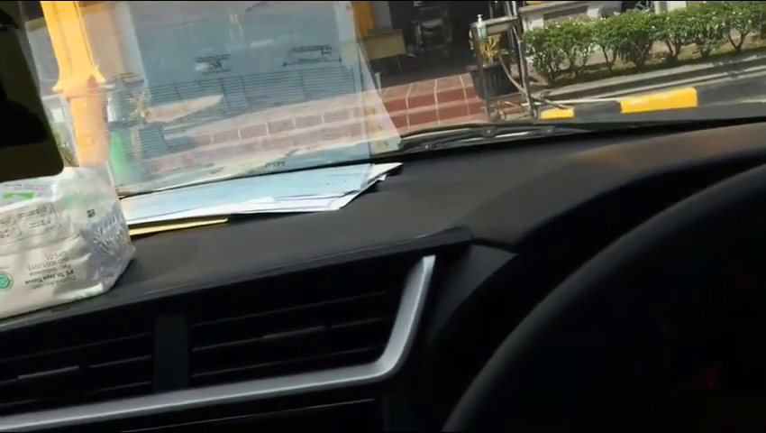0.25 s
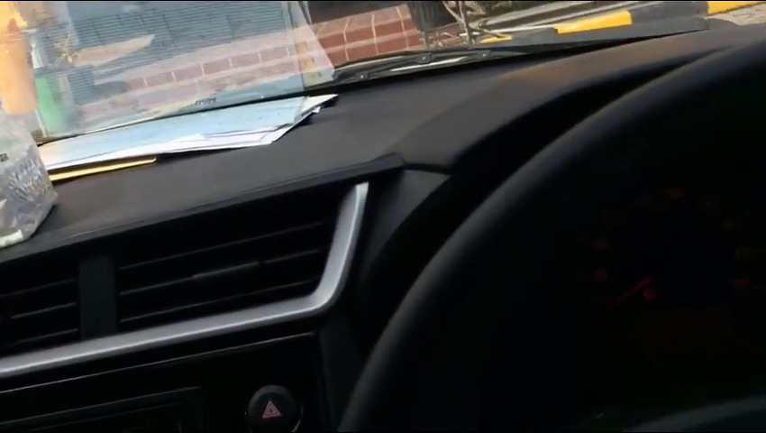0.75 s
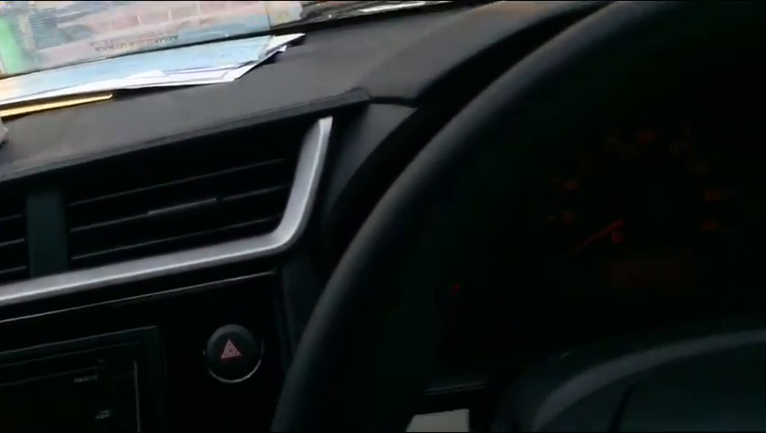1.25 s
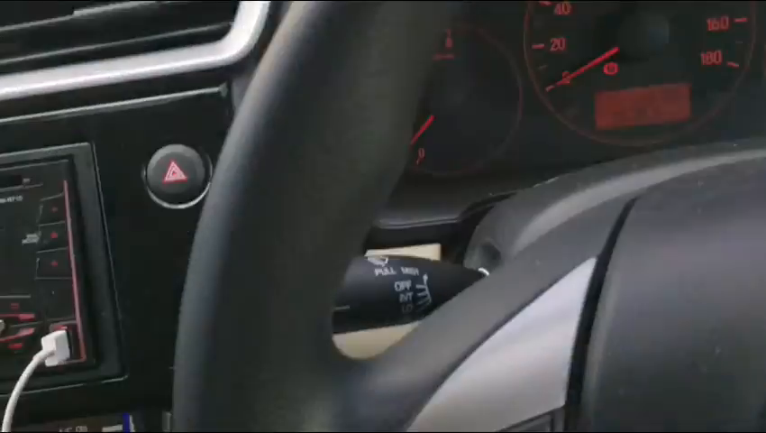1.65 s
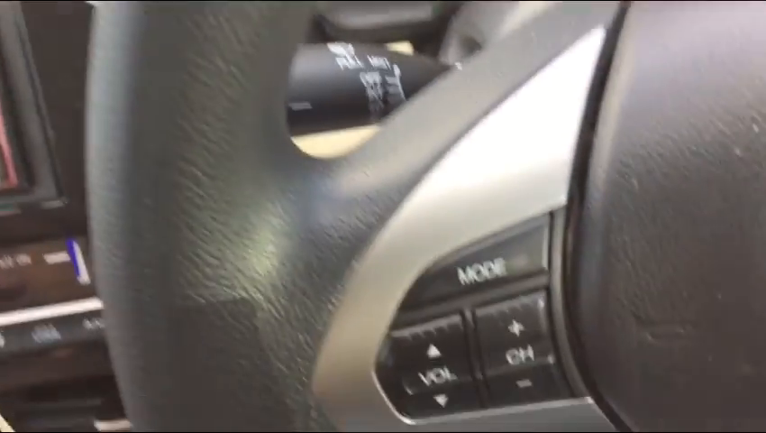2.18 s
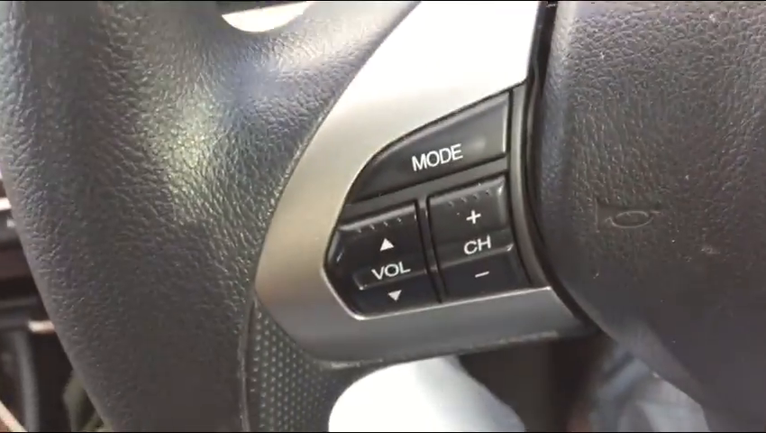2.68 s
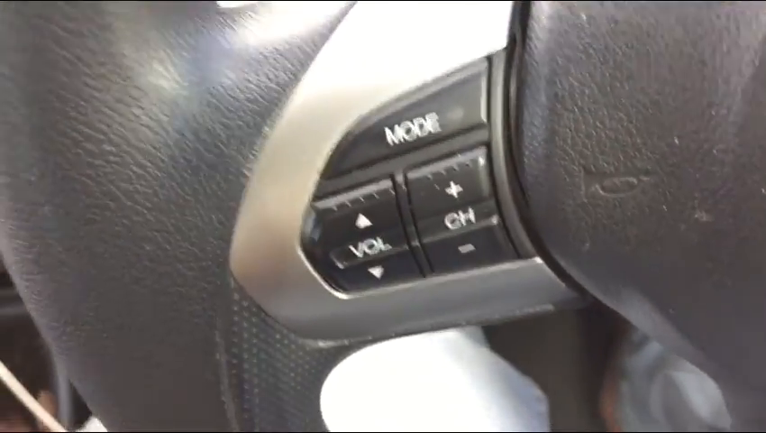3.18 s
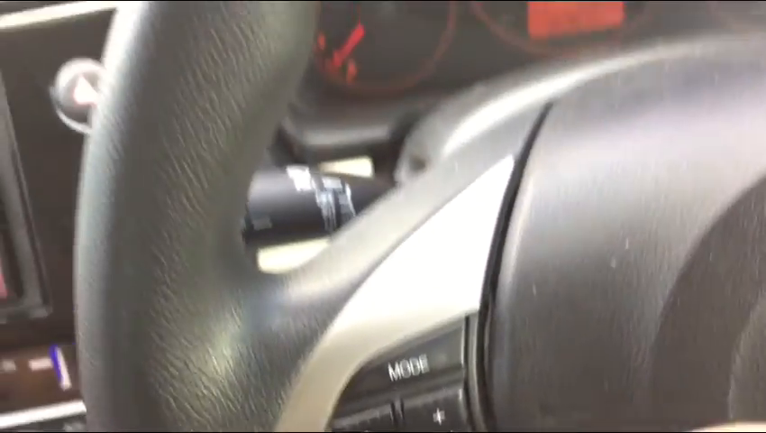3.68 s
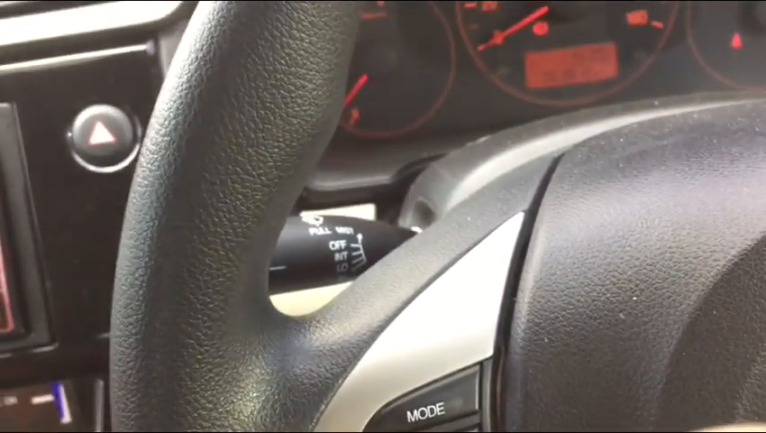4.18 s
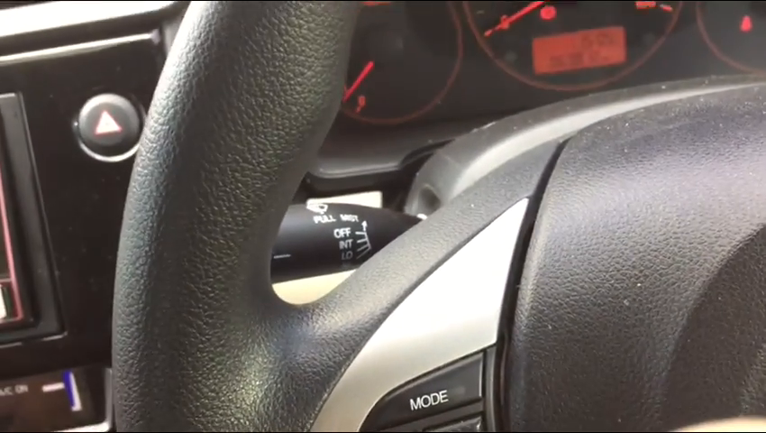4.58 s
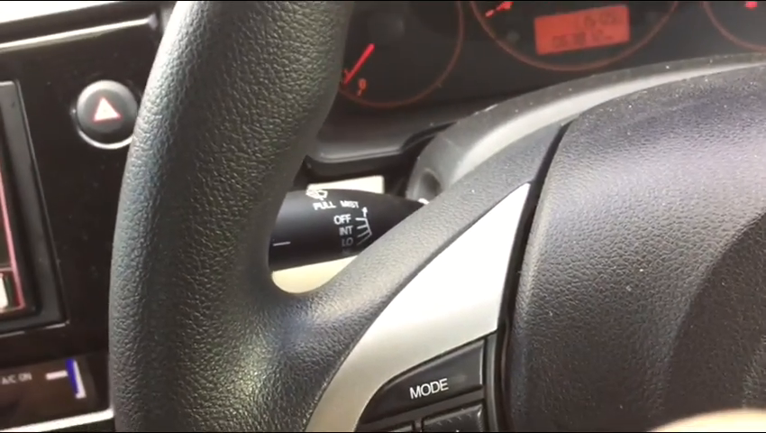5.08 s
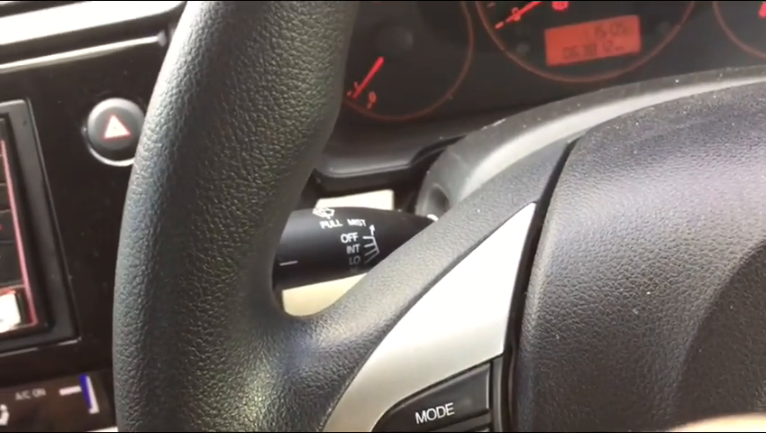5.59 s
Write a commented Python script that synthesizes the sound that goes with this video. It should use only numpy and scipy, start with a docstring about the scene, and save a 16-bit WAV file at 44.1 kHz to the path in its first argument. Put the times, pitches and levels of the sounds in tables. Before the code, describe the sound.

Inside a parked car, a handheld phone microphone picks up steady, low-heavy air from the dashboard vents. After half a second, uneven soft thumps of air begin to hit the microphone, growing dense in the middle. A very faint, thin finger scrape comes early, between one and two seconds; later a few dry handling ticks, one around three and a half seconds and the sharpest near five. The fan never stops.

```python
"""Inside a parked car with the air-conditioning fan on, a phone's microphone starts at the dashboard.
Noise coloured by duct resonances makes the steady air; a draught of small whirls rumbles, faint at first.
From half a second on, gusts thump the microphone unevenly, each a decaying, slowing pressure swing.
Between one and two seconds a fingertip scrapes the shell in grainy hiss as the phone nears the wheel.
It then moves on to the seat, and the grip lets out a few sharp ticks, each a short filtered pulse."""
import sys
import numpy as np
from scipy import signal
from scipy.fft import rfft, irfft
from scipy.io import wavfile
from scipy.ndimage import map_coordinates

SR = 44100
rng = np.random.default_rng(int(sys.argv[2]) if len(sys.argv) > 2 else 0)


def put_to_file(sound):
    """Save the sound as 16-bit audio at rate SR, in the file named by the first command-line argument."""
    columns = np.atleast_2d(sound).T  # one column per channel
    safe = np.clip(columns, -1, 1)
    whole_steps = np.round(safe * 32767)
    wavfile.write(sys.argv[1], SR, whole_steps.astype(np.int16))


N = 257984

# air rushing from the vents: (frequency [Hz], density relative to AIR_DB [dB])
AIR_SPECTRUM = [(25, -4), (55, 17), (90, 9.5), (130, 6.5), (190, 8), (260, 1), (310, -5.5), (400, -7),
                (780, -11), (1100, -5.5), (2000, -12), (2600, -16.5), (3200, -23.5), (4200, -25)]
AIR_DB = -63.5  # dB per Hz
# hiss of the vent slats: (frequency [Hz], density relative to HISS_DB [dB])
HISS_SPECTRUM = [(3800, 0.5), (4300, -8.5), (5000, -1), (7600, -9), (10400, -15.5), (12000, -11),
                 (15500, -19.5)]
HISS_DB = -96  # dB per Hz
# duct and grille resonances: (frequency [Hz], width [Hz], lift [dB])
DUCT_RESONANCES = [(396.5, 22.6, 9), (566, 64, 5.5), (989.6, 51, 8.5), (1477, 24, 5.5), (1692, 24, 4),
                   (2364, 71, 5.5), (6640, 640, 2.5), (8600, 220, 5.5), (9520, 370, 4)]
# cabin reflections at the dashboard: (frequency [Hz], width [Hz], lift or dip [dB])
DASHBOARD_REFLECTIONS = [(55, 12, -10), (190, 11, 3), (870, 110, -3.5), (1745, 170, 4), (2340, 57, -8),
                         (2840, 180, 3.5), (3540, 120, -5.5), (4100, 120, 4)]
# cabin reflections at the wheel: (frequency [Hz], width [Hz], lift or dip [dB])
WHEEL_REFLECTIONS = [(500, 840, 2), (1593, 85, -6), (2640, 26, -11), (5000, 83, -10.5), (7881, 710, -2.5),
                     (12000, 2000, -1.5)]
# cabin reflections at the seat: (frequency [Hz], width [Hz], lift or dip [dB])
SEAT_REFLECTIONS = [(1650, 54, -2), (2584, 77, 3), (3100, 270, -3), (3940, 200, 0.5), (4950, 99, -6.5),
                    (5950, 800, 1), (7800, 400, -3.5), (8300, 150, 3.5), (11500, 1300, -1)]
# the phone's path: (time [s], place [0 dashboard, 1 wheel, 2 and above seat], fan level before its swell [dB])
PHONE_PATH = [(0, 0.041, 0.5), (.8, 0.038, 0.4), (1.4, 0.15, 0), (1.9, 0.88, -0.24), (2.6, 0.73, -2),
              (3.4, 0.91, -2), (3.85, 1.76, -0.2), (4.6, 3, 0), (5.85, 3.6, 0)]
# strength of the draught before its flutter: (time [s], level [dB])
DRAUGHT_STRENGTH = [(0, -53), (0.9, -41), (1.1, -31.5), (1.6, -22), (2.3, -35), (2.7, -25), (3.2, -23.5),
                    (3.55, -20), (3.7, -35), (4.3, -24), (4.6, -32), (5.45, -22), (5.85, -51)]
# gusts that strike the microphone, before the common gust level in scene():
# (time [s], level [dB], pitch [Hz], decay [s], steep front relative to the level [dB])
GUST_HITS = [(0.507, -15.5, 121, 0.0061, -27), (0.543, -18, 167, 0.0088, -18),
             (0.801, -8, 99.7, 0.0039, -26), (1.047, -17.5, 190, 0.0062, -10),
             (1.078, -13, 80.5, 0.0077, -29), (1.113, -13.5, 183, 0.0036, -34),
             (1.174, -12.5, 139.5, 0.004, -16), (1.209, -14, 82.6, 0.01, -12),
             (1.233, -17, 119.3, 0.0055, -15), (1.363, -14.5, 82.4, 0.012, -14),
             (1.378, -14, 78, 0.0057, -13), (1.553, -14, 119, 0.01, -18), (1.641, -15, 109, 0.0056, -8),
             (1.721, -14.5, 182.3, 0.0089, -6), (1.774, -18, 576, 0.0025, -10),
             (1.779, -7.5, 120, 0.0054, -18), (1.803, -4, 216, 0.0022, -16), (1.826, -12, 204, 0.0081, -23),
             (1.926, -13.5, 338, 0.0029, -3), (1.931, -14, 85, 0.0067, -20),
             (2.011, -5, 200, 0.0055, -10.5), (2.05, -17, 199, 0.0077, -5), (2.086, -18.5, 298, 0.0025, -7),
             (2.093, -8, 104, 0.0047, -23), (2.11, -17, 130, 0.0057, -13), (2.12, -18, 260, 0.0032, -11),
             (2.148, -18.5, 157, 0.0067, -23), (2.244, -12, 129, 0.0045, -23),
             (2.255, -12, 194, 0.019, -18), (2.261, -17, 616, 0.0038, -2), (2.281, -14, 80.6, 0.0053, -4),
             (2.308, -16.5, 84, 0.022, -23), (2.355, -7.5, 87, 0.0081, -12.5),
             (2.472, -19, 142, 0.0072, -18), (2.494, -15, 174, 0.013, -3.5), (2.52, -16, 213, 0.0087, -5),
             (2.546, -8.5, 80.7, 0.003, -22), (2.592, -17.5, 484, 0.0039, -10),
             (2.599, -9, 217, 0.0051, -6.5), (2.622, -13, 97.4, 0.0093, -7.5),
             (2.645, -11, 420, 0.002, -20), (2.728, -19, 260, 0.0016, -18),
             (2.737, -11.5, 160.7, 0.0041, -10), (2.764, -12, 208.7, 0.004, -13),
             (2.826, -18.5, 564, 0.0047, -8), (2.837, -14, 274, 0.007, -5), (2.846, -13, 77.6, 0.007, -22),
             (2.86, -17.5, 268, 0.007, -5), (2.885, -14, 405, 0.0046, -6), (2.896, -6.5, 146, 0.0074, -18),
             (2.921, -14, 105.3, 0.0052, -8.5), (2.953, -14, 200.6, 0.0067, -13),
             (3.01, -14.5, 181, 0.0048, -21), (3.05, -4.5, 122, 0.0046, -45),
             (3.077, -15, 98.3, 0.0073, -25), (3.129, -11, 96.5, 0.0053, -10),
             (3.15, -13.5, 163, 0.0062, -9), (3.233, -16.5, 110, 0.0062, -16),
             (3.2686, -5, 490, 0.0025, -17), (3.273, -5.5, 270, 0.0014, -23),
             (3.298, -16, 300, 0.0034, -11), (3.306, -16, 129, 0.0092, -18),
             (3.321, -9.5, 270, 0.0023, -11), (3.329, -11, 373, 0.004, -14), (3.368, -10, 200, 0.0035, -24),
             (3.378, -22, 563, 0.0043, -14), (3.386, -18, 180, 0.0028, -16),
             (3.411, -10, 328, 0.0028, -10.5), (3.418, -7, 140, 0.0047, -11),
             (3.43, -10.5, 72, 0.0089, -24), (3.45, -11.5, 140, 0.0056, -12), (3.46, -11, 75, 0.0051, -22),
             (3.495, -8, 167, 0.0022, -8.5), (3.506, -11.5, 344, 0.0053, -6.5),
             (3.558, -17.5, 223, 0.005, -11), (3.574, -16.5, 148, 0.0069, -5.5),
             (3.729, -19, 237, 0.0053, -10), (3.746, -13, 131, 0.0062, -12), (3.765, -18.5, 85, 0.006, -10),
             (3.893, -7, 165, 0.0029, -10), (3.989, -13.5, 145, 0.0082, -15),
             (4.133, -12.5, 161, 0.0061, -13.5), (4.151, -21, 142, 0.015, -16),
             (4.156, -18, 180, 0.0063, -21), (4.243, -10.5, 213, 0.0055, -11.5),
             (4.268, -15.5, 143, 0.006, -25), (4.389, -7.5, 92.5, 0.005, -10),
             (4.506, -20, 220, 0.005, -13), (4.69, -23, 148, 0.013, -8), (4.739, -15, 172, 0.0045, -15),
             (4.809, -18.5, 330, 0.0041, -12), (4.821, -18, 114, 0.0084, -14),
             (4.832, -20, 161, 0.007, -20), (4.852, -14, 169, 0.01, -5), (4.867, -11, 176, 0.0037, -20),
             (4.888, -15.5, 167, 0.014, -10), (4.909, -11.5, 134.2, 0.0025, -25),
             (5.022, -17, 176.4, 0.0041, -17), (5.055, -12.5, 163, 0.0048, -7),
             (5.18, -20, 198, 0.0076, -9.5), (5.204, -8.5, 170, 0.011, -9), (5.222, -12, 190, 0.0089, -6.5),
             (5.352, -13, 274, 0.0041, -7.5), (5.363, -13.5, 121, 0.0061, -16),
             (5.402, -15.5, 147.5, 0.005, -7), (5.421, -13.5, 140, 0.0052, -6),
             (5.454, -14, 166, 0.0066, -29), (5.575, -13, 103.8, 0.0072, -8),
             (5.659, -9.5, 235, 0.0043, -9), (5.668, -9, 145, 0.0067, -15.5), (5.785, -18, 250, 0.0033, -9),
             (5.793, -10.5, 157, 0.0067, -27), (5.802, -10.5, 79.4, 0.012, -18)]
# a fingertip sliding over the shell:
# (time [s], half length [s], density at the centre [dB per Hz], centre [Hz], half width [Hz])
FINGER_SCRAPES = [(1.05, 0.027, -109, 12500, 1500), (1.173, 0.04, -101, 11400, 450),
                  (1.195, .02, -102, 14500, 800), (1.226, 0.019, -94, 12100, 800),
                  (1.45, 0.28, -106, 11200, 250), (1.71, .025, -108, 13000, 2200)]
# ticks of the grip, before the shell colours them: (time [s], peak [dB], lower edge [Hz], upper edge [Hz],
# lesser slips at their loudest relative to the peak [dB], spread of the slips to either side [s])
GRIP_TICKS = [(2.855, -37, 2900, 4300, -13, .011), (3.469, -22.5, 3000, 7900, -23, .004),
              (4.081, -35, 8300, 15200, -15, .002), (4.0835, -47, 8000, 15200, -12, .002),
              (4.0877, -38, 7800, 15200, -19, .003), (4.0907, -45, 8000, 15400, -9, .002),
              (4.0947, -43, 8400, 15200, -9, .007), (5.073, -17.5, 1300, 11500, -14.5, .004)]
# the phone's shell: (frequency [Hz], width [Hz], lift or dip [dB])
SHELL_RESONANCES = [(2300, 330, 13), (5450, 180, 2), (4020, 450, 5.5), (8900, 1100, 7), (10700, 180, -9),
                    (11400, 400, 6.5), (13400, 900, 5)]

TOP_HZ = 15750  # where the microphone's top is cut
LEAD_S = .04  # room ahead of each whirl's crossing
TICK_TAIL_S = .01  # decay of the faint tail of a slip
T = np.arange(N) / SR  # seconds
WHIRL_T = np.arange(SR // 8) / SR - LEAD_S  # seconds from a whirl's crossing
FREQS = np.maximum(np.arange(N // 2 + 1) * SR / N, 1)  # Hz


def undb(db):
    """Decibels to gain."""
    return 10 ** (np.asarray(db) / 20)


def curve(rows):
    """The columns of a time table, one value a sample."""
    s, *columns = np.transpose(rows)
    return [np.interp(T, s, column) for column in columns]


def slope(points):
    """A spectrum in dB through (Hz, dB) points, straight over log frequency."""
    hz, db = np.transpose(points)
    return np.interp(np.log(FREQS), np.log(hz), db)


def bumps(rows):
    """Bell-shaped lifts and dips in dB."""
    return sum(db * np.exp(-.5 * ((FREQS - hz) / width) ** 2) for hz, width, db in rows)


def colour(x, db):
    """Filter a sound by a spectrum in dB."""
    return irfft(rfft(x) * undb(db), N)


def noise(db):
    """Noise with the given spectrum in dB per Hz."""
    return colour(rng.standard_normal(N) * np.sqrt(SR / 2), db)


def butter(x, hz, kind, order=2):
    """Causal low-, high- or band-pass."""
    sections = signal.butter(order, hz, kind, fs=SR, output="sos")
    return signal.sosfilt(sections, x)


def walk(rate):
    """Smooth chance with a spread of 1, changing about rate times a second."""
    drift = irfft(rfft(rng.standard_normal(N)) * np.exp(-(FREQS / rate) ** 2), N)
    return drift / drift.std()


def add(out, sound, s):
    """Mix a sound in from time s."""
    start = int(s * SR)
    first, end = max(start, 0), min(start + len(sound), N)
    if end > first:
        out[first:end] += sound[first - start:end - start]


def flutter(x, shared_db=0.66, own_db=2.0, rate_hz=20, count=16):
    """Let a hiss flutter unevenly: a little as a whole, more in each of its overlapping bands."""
    band = np.minimum(FREQS / TOP_HZ, 1) * (count - 1)
    spectrum = rfft(x)
    fluttered = np.zeros(N)
    for k in range(count):
        share = np.maximum(1 - np.abs(band - k), 0)
        fluttered += irfft(spectrum * share, N) * undb(own_db * walk(rate_hz))
    return fluttered * undb(shared_db * walk(rate_hz))


def trim_echoes(x, echo_db=-15, from_hz=2500, first_s=0.001495, last_s=.009,
                sway_s=.00007, sway_hz=1.5, count=6):
    """Early echoes off glass and trim comb the treble; the comb shifts as the hand sways."""
    treble = butter(x, from_hz, "high", order=2)
    lags = first_s + (last_s - first_s) * (np.arange(count) + rng.random(count)) / count
    echoes = np.zeros(N)
    for lag in lags:
        heard_at = (T - lag - sway_s * walk(sway_hz)) * SR
        echoes += map_coordinates(treble, [heard_at], order=3, mode="mirror")
    return x + undb(echo_db) * echoes


def fan(swell_db=0.36, flicker_db=0.55, duct_cut_hz=4400, waver_db=1.65, waver_hz=9):
    """Turbulent air in the ducts and over the slats, coloured by where the phone is held."""
    place, level_db = curve(PHONE_PATH)
    rush = noise(slope(AIR_SPECTRUM) + AIR_DB) * undb(flicker_db * walk(32))
    hiss = flutter(noise(slope(HISS_SPECTRUM) + HISS_DB))
    flow = butter(rush, duct_cut_hz, "low", order=8) + hiss
    # each resonance swells and fades on its own as the flow shifts
    air = flow.copy()
    for row in DUCT_RESONANCES:
        resonance = colour(flow, bumps([row])) - flow
        air += resonance * undb(waver_db * walk(waver_hz))
    # the reflections of one place melt into those of the next
    heard = np.zeros(N)
    for k, rows in enumerate((DASHBOARD_REFLECTIONS, WHEEL_REFLECTIONS, SEAT_REFLECTIONS)):
        nearness = np.maximum(1 - np.abs(np.clip(place, 0, 2) - k), 0)
        heard += nearness * colour(air, bumps(rows))
    return trim_echoes(heard) * undb(level_db + swell_db * walk(0.22))


def eddy(t, hz, phase, decay_s, rise=0.37, sag=2.17, wake_hz=62, core=0.16):
    """One whirl crossing the microphone port at t = 0: a pressure swing that slows into its wake."""
    age = t / decay_s  # rise, sag and the round core are in decay times too
    pitch = wake_hz + (hz - wake_hz) * (1 - np.tanh(age / sag))
    size = np.exp(np.where(t < 0, -.5 * (age / rise) ** 2, core - np.hypot(age, core)))
    turns = np.cumsum(pitch) / SR
    turns_since_crossing = turns - np.interp(0, t, turns)
    return size * np.sin(2 * np.pi * (turns_since_crossing + phase))


def rumble(count=400, size_db=-5, scatter_db=4, flutter_db=4.0, flutter_hz=14,
           centre_hz=145, octaves=0.68, tilt_db=-6.5, cycles=0.87):
    """A stream of small whirls that comes in flutters; a stronger draught makes them louder."""
    out = np.zeros(N)
    draught_db = curve(DRAUGHT_STRENGTH)[0] + flutter_db * np.clip(walk(flutter_hz), -2, 1)
    moments = rng.random((count, 2))
    chance = np.clip(rng.standard_normal((count, 2)), -2, 2)
    for k, ((when, phase), (size, pitch)) in enumerate(zip(moments, chance)):
        i = int((k + when) / count * N)
        octave = octaves * pitch
        hz = centre_hz * 2 ** octave
        whirl = eddy(WHIRL_T, hz, phase, cycles / hz)
        level_db = size_db + draught_db[i] + scatter_db * size + tilt_db * octave  # tilt is per octave
        add(out, undb(level_db) * whirl, i / SR - LEAD_S)
    return out


def buffets(edge_mid_hz=480, mid_hz=200, edge_law=0.66, edge_cycles=0.97, edge_early_s=0.00052,
            tear_db=-14.0, tear_reach=2.2, tear_lo_hz=230, tear_hi_hz=520):
    """Each gust's whirl thumps the microphone; its steep front pops in step, and the air tears meanwhile."""
    front = WHIRL_T + edge_early_s
    thumps, tear_power = np.zeros(N), np.zeros(N)
    for (s, db, hz, decay_s, front_db), phase in zip(GUST_HITS, rng.random(len(GUST_HITS))):
        # a slow whirl has a round front, a fast one a sharp front
        edge_hz = edge_mid_hz * (hz / mid_hz) ** edge_law
        pop = eddy(front, edge_hz, phase, edge_cycles / edge_hz)
        thump = eddy(WHIRL_T, hz, phase, decay_s)
        add(thumps, undb(db) * (thump + undb(front_db) * pop), s - LEAD_S)
        tear_shape = np.exp(-(front / (tear_reach * decay_s)) ** 2)
        add(tear_power, undb(db + front_db + tear_db) ** 2 * tear_shape, s - LEAD_S)
    tear = butter(rng.standard_normal(N), [tear_lo_hz, tear_hi_hz], "band", order=2)
    return thumps + np.sqrt(tear_power) * tear / tear.std()


def brush(grain_db=3):
    """A fingertip slides over the shell in short scrapes, each a thin, grainy hiss."""
    hiss = np.zeros(N)
    for s, half_length_s, db, hz, width in FINGER_SCRAPES:
        band_db = db - 10 * np.log10(1 + ((FREQS - hz) / width) ** 4)
        stroke = np.exp(-.5 * ((T - s) / half_length_s) ** 2)
        hiss += noise(band_db) * stroke
    return hiss * undb(grain_db * walk(120))


def snap(low_hz, high_hz, ring_s, rattle_db=-17, tail_db=-22):
    """One slip on the phone's shell: a pulse, a short rattle and a faint tail; peak 1."""
    t = np.arange(SR // 30) / SR
    fade = np.exp(-t / ring_s) + undb(tail_db) * np.exp(-t / TICK_TAIL_S)
    pulse = t == 0
    slip = pulse + undb(rattle_db) * rng.standard_normal(len(t)) * fade
    thinned = butter(slip, low_hz, "high", order=3)
    sound = butter(thinned, min(high_hz, TOP_HZ), "low", order=2)
    return sound / np.abs(sound).max()


def ticks(count=7, main_ring_s=0.000098, slip_ring_s=0.0023, slip_low_hz=2300, early_s=0.0016, scatter_db=3):
    """The grip gives way in one dry snap, with a few lesser, thinner slips around it."""
    out = np.zeros(N)
    chances = rng.random((len(GRIP_TICKS), count, 2))
    for (s, db, low_hz, high_hz, slips_db, spread_s), slips in zip(GRIP_TICKS, chances):
        add(out, undb(db) * snap(low_hz, high_hz, main_ring_s), s)
        for k, (when, size) in enumerate(slips):
            gain = undb(db + slips_db - scatter_db * size)
            slip = gain * snap(max(low_hz, slip_low_hz), high_hz, slip_ring_s)
            offset_s = spread_s * (2 * (k + when) / count - 1)
            add(out, slip, s - early_s + offset_s)
    return colour(out, bumps(SHELL_RESONANCES))


def scene(gust_db=-1):
    """Fan, draught and hand together, in one channel."""
    air = fan() + rumble() + undb(gust_db) * buffets()
    hand = brush() + ticks()
    return (air + hand)[None]


def record(dry, low_cut_hz=40):
    """The phone's microphone drops the deepest bass and cuts the top."""
    thin = colour(dry, -10 * np.log10(1 + (low_cut_hz / FREQS) ** 8))
    top_cut = signal.ellip(10, .2, 80, TOP_HZ, fs=SR, output="sos")
    return signal.sosfilt(top_cut, thin)


dry = scene()
out = record(dry)
put_to_file(out)
```